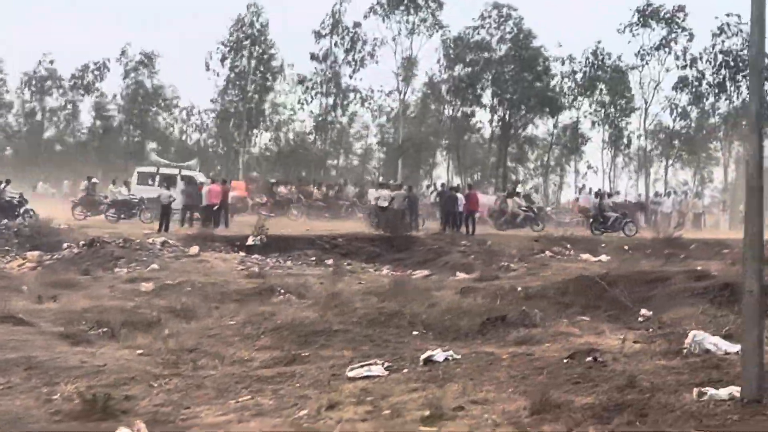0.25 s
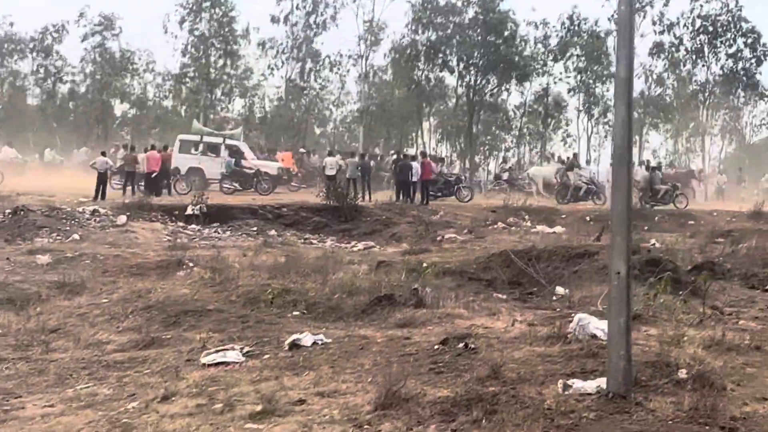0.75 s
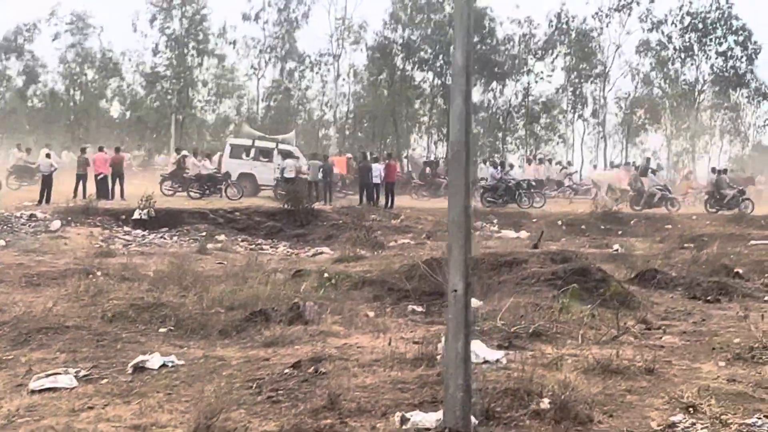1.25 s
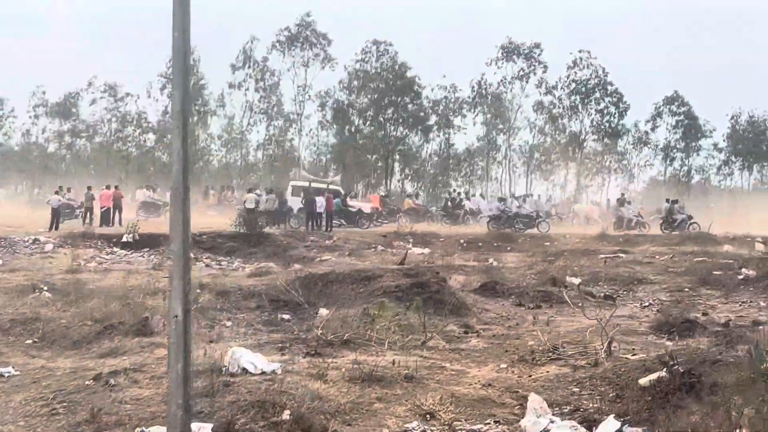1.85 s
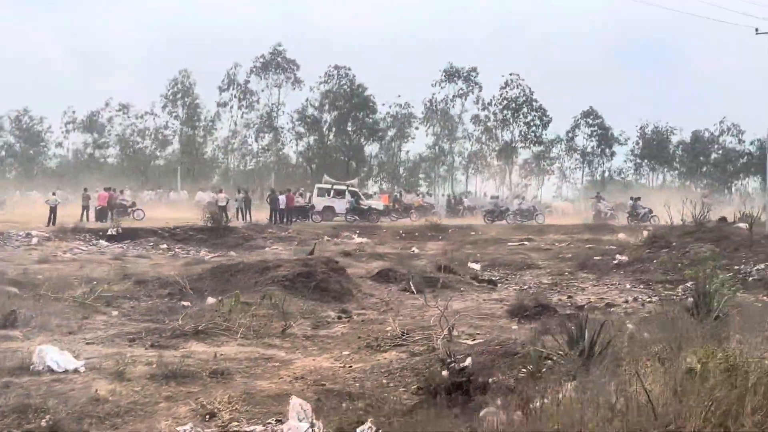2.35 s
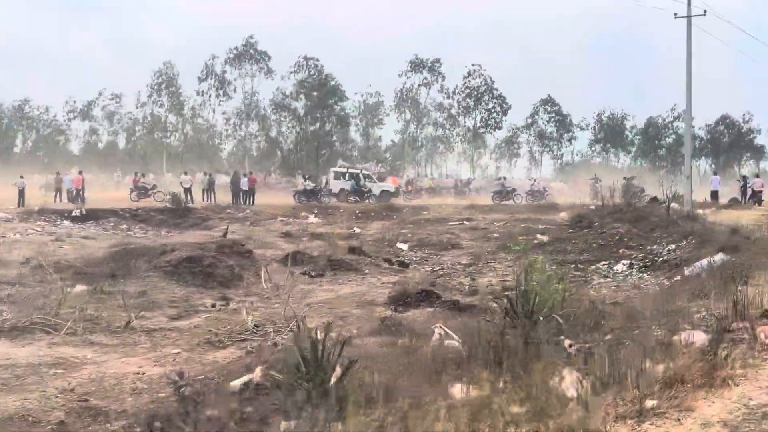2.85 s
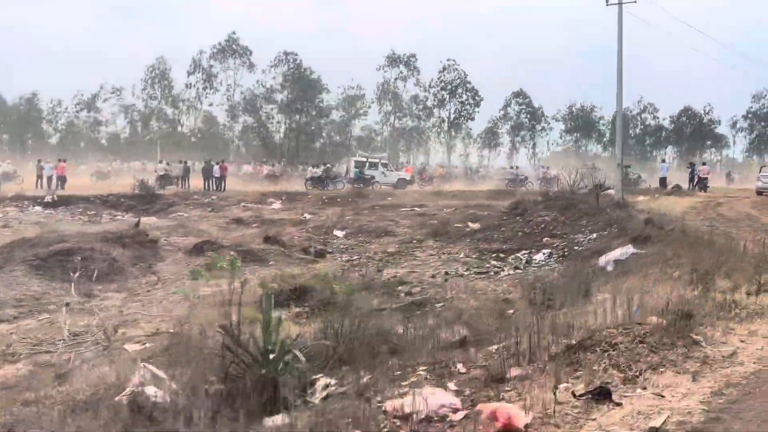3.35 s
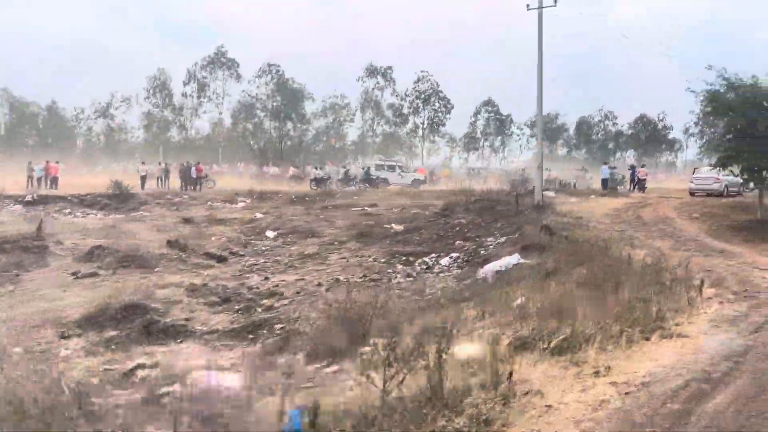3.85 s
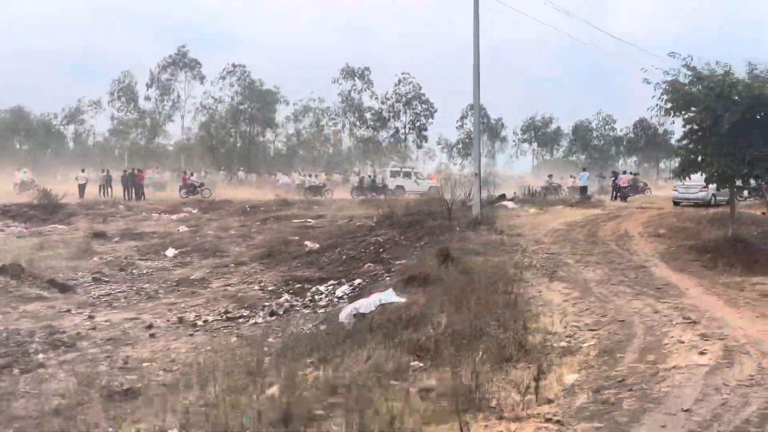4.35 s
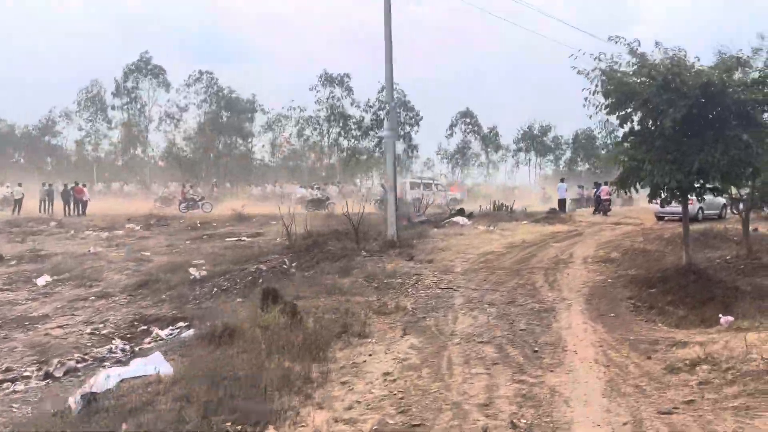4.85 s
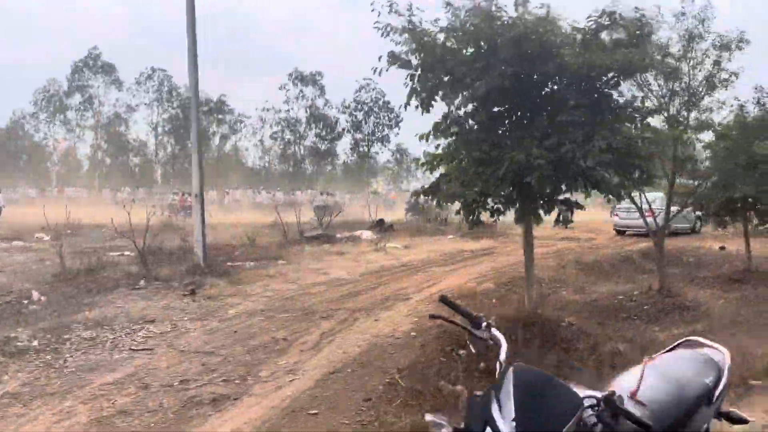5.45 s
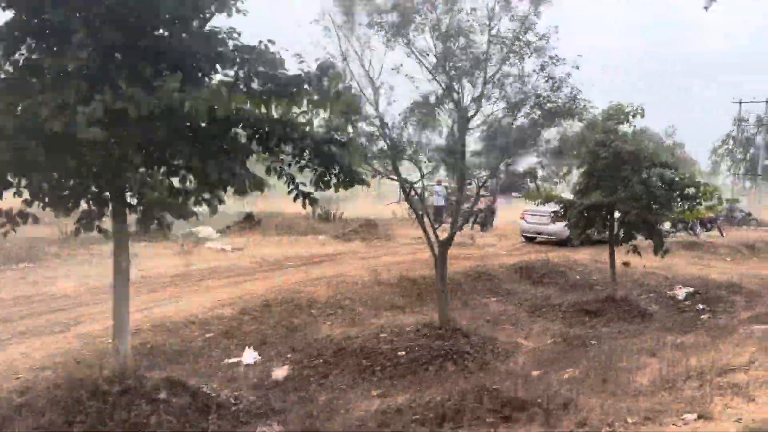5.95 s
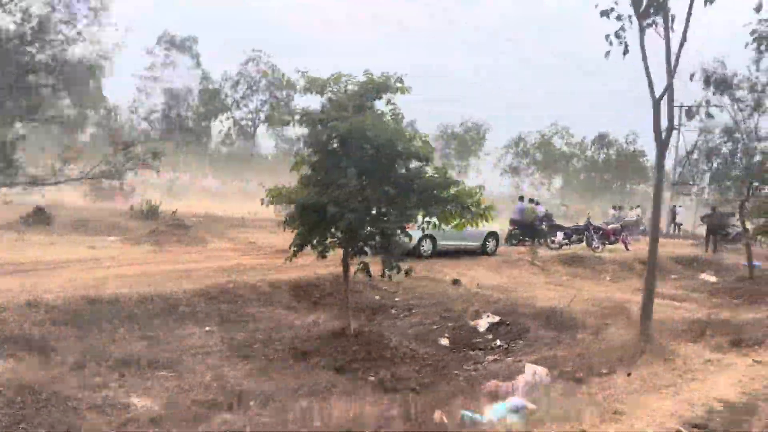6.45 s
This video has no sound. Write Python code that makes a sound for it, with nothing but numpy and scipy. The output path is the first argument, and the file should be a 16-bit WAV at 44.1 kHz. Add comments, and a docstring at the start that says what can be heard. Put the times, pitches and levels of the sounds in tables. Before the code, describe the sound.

Single-cylinder motorbike accelerates on a dirt track in rumbling wind, shuts its throttle, then gusts, grit crunches and whining gears remain.

```python
"""On board a small motorcycle on a dirt track, heard by a hand-held camera that swings to the side.
The single cylinder pulls up through one gear, then the throttle shuts: pulses ring through pipe and casing.
Shaped noise makes the wind's rumble and buffets, the wash of the road and the rasps of grit.
Wavering sines make the gear whine, the brake whistle and the whines of other machines."""
import sys
import numpy as np
from scipy import signal
from scipy.fft import rfft, irfft
from scipy.io import wavfile
from scipy.ndimage import uniform_filter1d, map_coordinates

SR = 44100
rng = np.random.default_rng(int(sys.argv[2]) if len(sys.argv) > 2 else 0)


def generate_wav(signal):
    """Clip the signal to [-1, 1] and save it as 16-bit WAV at the path in sys.argv[1]."""
    frames = np.transpose(np.atleast_2d(signal))
    scaled = np.clip(frames, -1, 1) * 32767
    pcm = np.round(scaled).astype(np.int16)
    wavfile.write(sys.argv[1], SR, pcm)


N = 295470
TIME = np.arange(N) / SR
BINS = np.fft.rfftfreq(N, 1 / SR)
LOG_BINS = np.log(BINS + 1)

# Relative levels and nominal pitches are trimmed, flickered or wavered by the function that plays them.
# engine pulling up through one gear: (time [s], firing rate [1/s])
REVS = [(0, 54.4), (.35, 57.1), (.5, 58.9), (.73, 62.1), (1.0, 65.2), (1.3, 68.2), (1.55, 71.6),
        (1.66, 73.8), (1.9, 75.4), (2.2, 79.6), (2.5, 83.2), (2.8, 87)]
# exhaust note, surging and sagging near the top of the pull: (time [s], relative level [dB])
EXHAUST = [(0, -16.5), (.35, -16), (.8, -19.5), (1.2, -19.5), (1.65, -18), (1.85, -26), (1.93, -20.5),
           (1.97, -21.5), (2.04, -20), (2.1, -14.5), (2.16, -18), (2.22, -18), (2.25, -20.5), (2.35, -16),
           (2.47, -24.5), (2.52, -17), (2.55, -20.5), (2.577, -29), (2.605, -15.5), (2.8, -24)]
# silencer response: (frequency [Hz], gain [dB])
PIPE = [(20, -45.5), (65, -11), (120, -7.5), (180, -18), (240, -7.5), (285, 5.5), (335, 8), (380, 4),
        (430, -2.5), (500, -7.5), (700, -14), (1050, -25), (2000, -43.5), (5000, -75.5)]
# ringing modes of the engine casing: (nominal frequency [Hz], width [Hz], relative level [dB])
CASING = [(1040, 110, -12), (1395, 50, 5), (1735, 33, 49), (2010, 70, 15), (3630, 420, -11),
          (5300, 310, -20.5)]
# clatter of the casing: (time [s], level [dB])
CLATTER = [(.15, -29.5), (.3, -34), (.5, -40), (.87, -39), (1.0, -35), (1.9, -36.5), (2.2, -33.5),
           (2.5, -40), (2.82, -46), (2.88, -65), (3.3, -100)]
# sizzle of the valve gear: (frequency [Hz], gain [dB])
SIZZLE = [(1500, -40), (2700, 3), (3300, 0), (3900, 0.5), (5050, 2), (5500, -12), (6700, -5), (8000, -40)]
# rubbing brake, fading as the machine gathers speed: (time [s], nominal pitch [Hz], relative level [dB])
WHISTLE = [(0, 3560, -45), (.13, 3570, -42.5), (.33, 3620, -51), (.48, 3575, -44), (.65, 3530, -43),
           (.82, 3560, -48), (.9, 3570, -57), (.98, 3576, -50), (1.18, 3560, -47), (1.24, 3560, -54),
           (1.38, 3560, -50), (1.52, 3560, -62), (2.08, 3595, -50), (2.35, 3590, -62), (2.9, 3590, -95)]
# swing of the camera to the side: (time [s], share of the swing [0-1])
TURN = [(3.0, 0.038), (3.4, 0.61), (4.2, 0.76)]
# shade of the machine on the left port when facing ahead: (frequency [Hz], gain [dB])
SHADE = [(1000, 1.5), (1400, -9.5), (1750, -10), (2200, -9), (2700, -1)]
# wash of tyres, chain and other motorcycles: (time [s], relative level [dB])
ROAD = [(0, -34), (.6, -36), (2.8, -35.5), (2.88, -40.5), (2.99, -38), (3.06, -37), (4.15, -38.5),
        (5.2, -37.5), (6.7, -34)]
# spectra of the wash, facing ahead and facing sideways: (frequency [Hz], gain [dB])
ROAD_AHEAD = [(100, -28), (500, 8.5), (1000, 9), (1350, 8), (2200, 2.5), (2700, -10), (4400, -14.5),
              (5800, -17.5), (7500, -40), (11000, -101)]
ROAD_ASIDE = [(100, -3), (500, 8.5), (1000, 8), (1350, 5.5), (2250, 1), (2700, -8.5), (4200, -10.5),
              (5200, -21), (6500, -18.5), (8000, -72), (11000, -61)]
# likeness of the two ports, facing ahead and facing sideways: (frequency [Hz], left-right likeness [0-1])
AHEAD_LIKENESS = [(300, 0.042), (1000, 1), (1600, 0), (2200, 0.41), (3000, 1), (5000, 1), (6000, 0.11)]
ASIDE_LIKENESS = [(300, 0.32), (1300, 0.48), (4000, 0.15), (7000, 0.11)]
# low thrum of motorcycles running nearby: (frequency [Hz], gain [dB])
THRUM = [(25, -33), (50, 11.5), (69, 2), (88, 2.5), (135, 3.5), (200, -5.5), (500, -68)]
# faint hiss on top: (frequency [Hz], gain [dB])
HISS = [(4000, -13), (7000, 5), (8500, -0.5), (10800, 4), (12500, -1), (14400, 2)]
# left-right phase of the hiss: (frequency [Hz], phase [half turns])
HISS_PHASE = [(6000, 0), (7900, .9), (9000, 1.1), (10000, 1.5), (11000, 1.85), (12700, 2.15), (15000, 2.8)]
# gear whine: (time [s], nominal mesh rate [Hz], relative level [dB])
WHINE = [(0, 532.5, -38), (.9, 541, -37.5), (1.7, 548, -40), (2.6, 550, -40.5), (4.3, 519, -57),
         (4.68, 517, -46), (4.78, 519, -46), (4.92, 534.3, -47.5), (5.2, 534, -43.5), (5.43, 546.3, -45.5),
         (5.72, 553, -41.5), (5.92, 551.3, -50), (6.22, 552.5, -40.5), (6.35, 548, -44), (6.55, 557, -42)]
# its overtones: (multiple of the mesh rate, gain facing ahead [dB], gain facing sideways [dB])
OVERTONES = [(2, -13.5, 6), (3, -10, 4), (4, -5, 1)]
# its brightness: (time [s], tilt [dB per overtone])
WHINE_TILT = [(3, -5), (4.8, -1), (5.5, -3), (6.2, 2.5)]
# airflow, strong at first, then slack, then freshening: (time [s], relative rumble level [dB])
WIND = [(0, -15.5), (.15, -14.5), (1.72, -15), (2.0, -24.5), (2.98, -32), (3.08, -23.5), (4.65, -27),
        (5.2, -24), (6.7, -21.5)]
# gusts: (time [s], length [s], rumble level [dB], roar level [dB])
GUSTS = [(0.195, 0.12, -13, -24.5), (0.378, 0.27, -13.5, -30), (.53, 0.078, -15.5, -24),
         (0.788, 0.06, -14.5, -16.5), (1.164, .12, -22, -19.5), (1.283, 0.12, -17, -18.5),
         (1.512, 0.062, -13.5, -19), (1.655, 0.11, -14, -14), (1.835, 0.27, -25, -18.5),
         (2.177, 0.012, -40, -10.5), (2.396, .007, -40, -16), (2.454, 0.22, -40, -19.5),
         (2.657, 0.15, -26, -34), (3.153, .15, -39, -38), (3.873, 0.097, -42, -29.5),
         (4.436, 0.071, -25.5, -26.5), (4.916, 0.06, -21, -25), (5.082, 0.11, -23, -23),
         (5.16, 0.035, -17.5, -42), (5.27, 0.15, -28, -28.5), (5.628, 0.028, -15, -19.5),
         (5.749, 0.039, -39, -19.5), (6.066, 0.19, -22, -25), (6.466, 0.051, -15, -28),
         (6.555, 0.049, -20, -27)]
# eddies that strike the microphone: (time [s], relative level [dB], length [s])
BUFFETS = [(.805, -19, 0.031), (1.32, -7, 0.019), (1.808, -9.5, 0.012), (1.852, -10.5, 0.026),
           (2.12, -19, 0.028), (3.076, -21, 0.0078), (3.85, -19.5, 0.04), (4.008, -15.5, 0.036),
           (4.27, -12, 0.011), (4.83, -14, 0.011), (5.535, -18.5, 0.016), (5.17, -14.5, 0.054),
           (5.345, -15, 0.012), (5.41, -11, 0.012), (5.44, -15.5, 0.017), (5.745, -20.5, 0.03),
           (5.89, -10.5, .005), (5.91, -14, 0.019), (6.1, -13.5, 0.018), (6.19, -17.5, 0.04),
           (6.263, -8.5, 0.011), (6.343, -10.5, 0.015), (6.475, -19, 0.023), (6.565, -14, 0.017),
           (6.619, -9, 0.0048)]
# spectra of the wind's rumble, its roar and a buffet: (frequency [Hz], gain [dB])
RUMBLE = [(15, -32), (28, -27), (45, -8), (65, -0.5), (120, -0.5), (180, -5), (260, -4), (450, -17.5),
          (1000, -102.5)]
ROAR = [(60, -61.5), (160, -15), (300, 2), (500, 1), (800, -5), (1200, -17), (2200, -27), (4500, -71),
        (9000, -102)]
BUFFET = [(30, -25), (80, -7.5), (170, 5), (320, -0.5), (550, -8), (1000, -19), (2500, -36), (6000, -86)]
# likeness of the wind at the two ports: (frequency [Hz], left-right likeness [0-1])
WIND_LIKENESS = [(60, 1), (130, 0.4), (300, 0.38), (700, 0.6), (2000, 0.12)]
# whines of other machines: (time [s], relative level [dB], length [s], nominal pitch [Hz])
FAR_WHINES = [(.1, -40, 0.18, 1765), (.4, -38, 0.15, 1050), (1.386, -37, 0.12, 1392),
              (4.474, -44, 0.32, 1747), (5.703, -37, 0.15, 1120), (6.03, -39.5, .25, 1290),
              (6.28, -36, 0.13, 1578), (6.45, -35.5, .4, 656)]
# small sharp ticks: (time [s], level [dB], length [s])
TICKS = [(.196, -44, 0.0017), (.522, -28, 0.0034), (3.936, -30, 0.0014), (4.102, -30, 0.0056)]
# clods crunching under the tyres: (time [s], relative level [dB], decay [s])
CRUNCHES = [(3.014, -32.5, 0.0073), (3.755, -22.5, 0.0075), (3.786, -23, 0.01), (3.828, -24, 0.013),
            (3.848, -24.5, 0.0082), (3.871, -19, 0.0063), (3.897, -22.5, 0.022), (6.32, -28, .005)]
# spectrum of a crunch: (frequency [Hz], gain [dB])
CRUNCH = [(300, -3), (1200, 11.5), (3500, 3.5), (7000, -14.5), (9000, -55)]
# tyre rasps on grit: (time [s], relative level [dB], length [s])
RASPS = [(3.45, -30.5, 0.049), (3.6, -28.5, 0.018), (3.865, -25, 0.21), (4.36, -30.5, 0.098),
         (6.32, -29, 0.088)]
# spectrum of a rasp: (frequency [Hz], gain [dB])
GRIT = [(200, 5), (800, 16.5), (1500, 14.5), (2300, 10), (3200, -1.5), (5500, -11), (7000, -20),
        (9000, -103), (14000, -46)]
# faint high squeaks off to the left: (time [s], left level [dB], length [s], centre pitch [Hz])
SQUEAKS = [(4.033, -49, 0.28, 5300), (4.682, -46.5, 0.12, 3730), (5.14, -45, 0.073, 4300)]

# the throttle is held, then shuts: the note drops at once and dies away
SHUT_S, SHUT_DROP_DB, SHUT_TIME_S, DIE_DB_PER_S = 2.548, 4, .03, 62
# near the top of the revs the note breaks into an uneven growl
GROWL_S, GROWL_LENGTH_S, GROWL_WOBBLE_S = 2.3, 0.18, 0.00058
# the casing rings a little sharp at first (share of pitch), while the engine labours
LABOUR_S, LABOUR_SHARP = 0.35, 0.0091
# the valve gear's ticking ring: centre pitch, width, level at the start and spread between strokes
RATTLE_HZ, RATTLE_WIDTH_HZ, RATTLE_DB, RATTLE_SPREAD_DB = 5600, 450, -52, 8
# sizzle and ring fade as the engine smooths out
RATTLE_FADE_DB_PER_S = 5
# the hiss sits below the wash level
HISS_DB = -13.5
# the roar follows the airflow by a share of its dB
ROAR_SHARE, ROAR_DB = 0.45, -19.5
# upper band limit
CUT_HZ = 14450


def amp(db):
    """Decibels to gain."""
    return np.exp(np.asarray(db) * (np.log(10) / 20))


def unit(x):
    """Scales to rms 1."""
    return x / np.sqrt(np.mean(x ** 2) + 1e-20)


def curves(rows):
    """Every column of a table, joined by straight lines in time."""
    s, *columns = np.transpose(rows)
    return [np.interp(TIME, s, column) for column in columns]


def across(points):
    """Reads (Hz, value) points on a log-frequency axis."""
    hz, value = np.transpose(points)
    return np.interp(LOG_BINS, np.log(hz), value)


def colour(x, points, size=4096):
    """Causal minimum-phase filter with the given (Hz, dB) response."""
    hz = abs(np.fft.fftfreq(size, 1 / SR))
    log_gain = np.log(amp(np.interp(hz, BINS, across(points))))
    taps = np.fft.ifft(np.exp(signal.hilbert(log_gain).conj())).real
    return signal.oaconvolve(x, taps[:size // 2])[:N]


def drift(rate, size=16384):
    """Smooth chance of rms 1 that moves up to about rate times a second."""
    spectrum = rfft(rng.standard_normal(size))
    slow = irfft(spectrum / (1 + (BINS[:size // 2 + 1] / rate) ** 4))
    return np.interp(TIME, np.linspace(0, TIME[-1], size), unit(slow))


def white():
    """The spectrum of a fresh white noise."""
    return rng.standard_normal(2 * len(BINS)).view(complex)


def noise_pair(points, likeness):
    """Coloured noise at the two microphone ports, partly alike."""
    same = across(likeness)
    mid = white() * np.sqrt(1 + same)
    side = white() * np.sqrt(1 - same)
    return unit(irfft(np.array([mid + side, mid - side]) * amp(across(points)), N))


def bursts(rows):
    """A bell-shaped swell for each (s, dB, length) row, summed in power."""
    power = np.zeros(N)
    for s, db, length in rows:
        near = slice(*np.searchsorted(TIME, [s - 2 * length, s + 2 * length]))
        power[near] += amp(db) ** 2 * np.exp(-(2 * (TIME[near] - s) / length) ** 2)
    return np.sqrt(power)


def steadied(pair, size=700):
    """Evens out the chance swells of a noise, so that each burst cut from it has its own strength."""
    return pair / np.sqrt(uniform_filter1d((pair ** 2).mean(0), size) + 1e-9)


def patchy(pair, depth_db, size=1024):
    """Patches of the spectrum swell and sink by chance, so the wash churns."""
    overlap = size * 3 // 4
    z = signal.stft(pair, nperseg=size, noverlap=overlap)[2]
    field = rng.standard_normal(z.shape[1:])
    field = uniform_filter1d(field, size=4, axis=0)  # smooth over frequency
    field = unit(uniform_filter1d(field, size=9, axis=1))  # smooth over time
    z = z * unit(amp(depth_db * field))
    return signal.istft(z, nperseg=size, noverlap=overlap)[1][:, :N]


def turned(pair, lead_s=0.000456):
    """The swing lifts the shade from the left port and lets the sound reach it first."""
    turn, = curves(TURN)
    left = turn * pair[0] + (1 - turn) * colour(pair[0], SHADE)
    right = map_coordinates(pair[1], [(TIME - lead_s * turn) * SR], order=3, mode="nearest")
    return np.array([left, right])


def engine(unevenness=0.14, puff_db=-13, flutter_db=0.75, wobble_s=0.00017, knock_puff_db=-14):
    """Each firing sends a pulse and a puff of gas down the silencer and knocks the casing."""
    rate, = curves(REVS)
    shut = np.maximum(TIME - SHUT_S, 0)
    throttle_db = -SHUT_DROP_DB * np.minimum(shut / SHUT_TIME_S, 1) - DIE_DB_PER_S * shut
    cycles = np.cumsum(rate) / SR + .002 * drift(20)
    pulses = np.diff(np.floor(cycles), prepend=0)
    firings = unit(pulses * (1 + unevenness * drift(81)))
    puffs = unit(np.exp(-5 * (cycles % 1)) * rng.standard_normal(N))
    pipe = colour(firings + amp(puff_db) * puffs, PIPE)
    # the note's timing wavers, most of all in the growl
    growl = np.exp(-((TIME - GROWL_S) / GROWL_LENGTH_S) ** 2)
    pipe = np.interp(TIME + (wobble_s + GROWL_WOBBLE_S * growl) * drift(25), TIME, pipe)
    knocks = casing(firings + amp(knock_puff_db) * puffs)
    # level both by their strength while the throttle is held
    pulling = TIME < SHUT_S
    exhaust = pipe / np.std(pipe[pulling]) * amp(curves(EXHAUST)[0] + flutter_db * drift(9.2))
    clatter = knocks / np.std(knocks[pulling]) * amp(curves(CLATTER)[0])
    return (exhaust + rattle(firings, puffs)) * amp(throttle_db) + clatter


def casing(drive, wander=0.0088):
    """The engine's metal parts ring in a few broad modes that wander slightly."""
    stretch = 1 + LABOUR_SHARP * np.exp(-(TIME / LABOUR_S) ** 2) + wander * drift(4)
    clock = np.cumsum(stretch) / SR
    out = np.zeros(N)
    for hz, width, db in CASING:
        # shift the mode down to zero frequency, let it ring there, shift it back
        spin = np.exp(2j * np.pi * hz * clock)
        r = np.exp(-np.pi * width / SR)
        out += amp(db) * (spin * signal.lfilter([1 - r], [1, -r], drive / spin)).real
    band = signal.butter(2, [700, 4500], "band", fs=SR, output="sos")
    return signal.sosfilt(band, out)


def rattle(firings, puffs, detune=.05, sizzle_db=-44.5):
    """The valve gear sizzles with every firing and rings on every second one, never quite at the same pitch."""
    t = TIME[:1024]
    rings = np.zeros(N + 1024)
    strokes = np.flatnonzero(firings)[::2]
    for at, (force, offset) in zip(strokes, rng.uniform(-1, 1, (len(strokes), 2))):
        tone = np.sin(2 * np.pi * RATTLE_HZ * (1 + detune * offset) * t)
        ring = tone * t * np.exp(-np.pi * RATTLE_WIDTH_HZ * t)
        rings[at:at + len(t)] += ring * amp(RATTLE_SPREAD_DB * force)
    sizzle = unit(colour(puffs + rng.standard_normal(N), SIZZLE)) * amp(sizzle_db)
    return (unit(rings[:N]) * amp(RATTLE_DB) + sizzle) * amp(-RATTLE_FADE_DB_PER_S * TIME)


def gravel(per_s=70, spread_db=5, gravel_db=-55):
    """Small stones crackle at random under the tyres; a few are much louder."""
    hits = rng.random(N) < per_s / SR
    sizes = amp(spread_db * np.minimum(rng.exponential(1, N), 3.5)) * hits
    crunch = rng.standard_normal(200) * np.exp(-np.arange(200) / 35)
    snaps = signal.oaconvolve(sizes, crunch)[:N]
    stone = [(400, -6), (1800, 12.0), (5000, 5.5), (8000, -37.0), (13000, -4.0)]  # (Hz, dB)
    return unit(colour(snaps, stone)) * amp(gravel_db)


def whistle(waver=0.0013, flicker_db=1.0, whistle_db=-3.0):
    """A thin unsteady metal tone that swells and fades as the brake rubs."""
    hz, level = curves(WHISTLE)
    phase = 2 * np.pi * np.cumsum(hz * (1 + waver * drift(60))) / SR
    return unit(np.sin(phase)) * amp(level + whistle_db + flicker_db * drift(25))


def road(ahead_db=7, aside_db=9.5, shake_db=1.26, shake_rate=70, thrum_db=-35, patchy_db=2.34):
    """Tyres, chain and other engines merge into a shaking wash over a low thrum."""
    level, = curves(ROAD)
    turn, = curves(TURN)
    ahead = np.sqrt(1 - turn) * noise_pair(ROAD_AHEAD, AHEAD_LIKENESS) * amp(ahead_db)
    aside = np.sqrt(turn) * noise_pair(ROAD_ASIDE, ASIDE_LIKENESS) * amp(aside_db)
    thrum = unit(colour(rng.standard_normal(N), THRUM)) * amp(thrum_db)
    ahead = np.array([colour(ahead[0], SHADE), ahead[1]])
    wash = patchy(ahead + turned(aside), patchy_db)
    return wash * amp(level + shake_db * drift(shake_rate)) + thrum


def hiss(flicker_db=1.5):
    """One faint hiss that follows the wash, its phase differing between left and right."""
    left = white() * amp(across(HISS))
    right = left * np.exp(1j * np.pi * across(HISS_PHASE))
    pair = irfft(np.array([left, right]), N)
    return unit(pair) * amp(curves(ROAD)[0] + HISS_DB + flicker_db * drift(120))


def whine(flicker_db=2.5, left_db=1, right_db=-2):
    """Gear teeth sing three wavering overtones, which come out as the camera swings and then brighten."""
    hz, level = curves(WHINE)
    turn, = curves(TURN)
    tilt, = curves(WHINE_TILT)
    waver = (.009 - .002 * turn) * drift(65) + .0028 * drift(7)
    phase = 2 * np.pi * np.cumsum(hz * (1 + waver)) / SR
    tones = np.zeros(N)
    # the tilt pivots on the middle overtone
    for step, (multiple, ahead_db, aside_db) in enumerate(OVERTONES, -1):
        tone = unit(np.sin(multiple * phase) * amp(flicker_db * drift(16)))
        facing_db = (1 - turn) * ahead_db + turn * aside_db
        tones += tone * amp(level + step * tilt + facing_db)
    return tones * amp([[left_db], [right_db]])


def wind(rumble_db=-1, swell_db=-1.5, swell_rate=7, roar_flutter_db=2.0, flutter_rate=45, buffet_db=-1):
    """Turbulence at the ports: airflow and gusts drive a rumble and a fluttering roar, and large eddies thump."""
    flow_db = curves(WIND)[0] + swell_db * drift(swell_rate)
    rumble_gusts = bursts([(s, db, length) for s, length, db, _ in GUSTS])
    roar_gusts = bursts([(s, db, length) for s, length, _, db in GUSTS])
    rumble_gain = np.hypot(amp(flow_db + rumble_db), rumble_gusts)
    roar_gain = np.hypot(amp(ROAR_SHARE * flow_db + ROAR_DB), roar_gusts)
    rumble = noise_pair(RUMBLE, WIND_LIKENESS) * rumble_gain
    flutter = amp(roar_flutter_db * drift(flutter_rate))
    roar = unit(noise_pair(ROAR, WIND_LIKENESS) * flutter) * roar_gain
    thumps = steadied(noise_pair(BUFFET, WIND_LIKENESS)) * bursts(BUFFETS) * amp(buffet_db)
    return rumble + roar + thumps


def far_whines(waver=0.0049, flicker_db=1.5, far_db=-1):
    """Other machines' whines swell out of the wash and sink back."""
    phase = 2 * np.pi * np.cumsum(1 + waver * drift(29.5)) / SR  # of a 1 Hz tone
    tones = sum(unit(np.sin(hz * phase)) * bursts([(s, db, length)]) for s, db, length, hz in FAR_WHINES)
    return tones * amp(far_db + flicker_db * drift(25))


def grit(grain_db=3.0, grain_rate=400, left_db=2.5, rise_s=0.0013):
    """Grainy rasps from the tyres, clods that crunch under them, and a few ticks of flung stones."""
    likeness = [(300, 0.24), (1500, 0.063)]  # (Hz, left-right likeness)
    grain = amp(grain_db * drift(grain_rate))
    rasps = unit(noise_pair(GRIT, likeness) * grain) * bursts(RASPS)
    crushing = np.zeros(N)
    for s, db, decay in CRUNCHES:
        age = np.maximum(TIME - s, 0)
        crushing += amp(db) * np.minimum(age / rise_s, 1) * np.exp(-np.minimum(age / decay, 10) ** 2)
    crunches = unit(noise_pair(CRUNCH, likeness) * grain) * crushing
    tick = [(1000, 16.5), (5000, 6), (15000, -7)]  # (Hz, dB)
    ticks = noise_pair(tick, ASIDE_LIKENESS) * bursts(TICKS)
    return (rasps + crunches) * amp([[left_db], [-left_db]]) + ticks


def squeaks(width_hz=150, right_db=-8):
    """Short fuzzy high notes: noise narrowed to a band around each pitch, weaker on the right."""
    out = np.zeros(N)
    for s, db, length, hz in SQUEAKS:
        note = irfft(white() / (1 + ((BINS - hz) / width_hz) ** 2), N)
        out += unit(note) * bursts([(s, db, length)])
    return out * amp([[0], [right_db]])


def scene():
    """The machine and the track around the camera, and the wind right on it."""
    machine = engine() + gravel() + whistle()
    track = road() + hiss() + far_whines() + grit() + squeaks()
    return turned([machine, machine]) + whine() + track + wind()


def record(dry):
    """Peaks round off near full scale; then the band limit."""
    rounded = dry / (1 + (dry * dry) ** 4) ** (1 / 8)
    lowpass = signal.firwin(511, CUT_HZ, window=("kaiser", 9), fs=SR)
    return signal.oaconvolve(rounded, lowpass[None], "same")


dry = scene()
out = record(dry)
generate_wav(out)
```